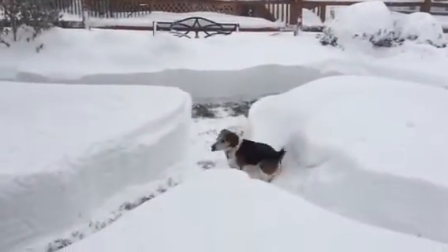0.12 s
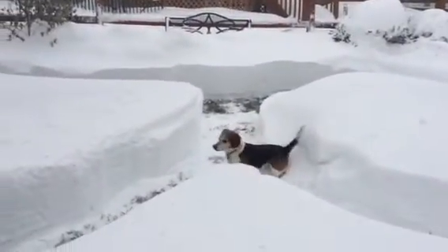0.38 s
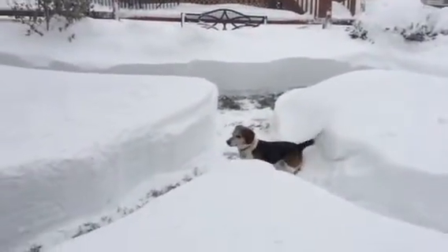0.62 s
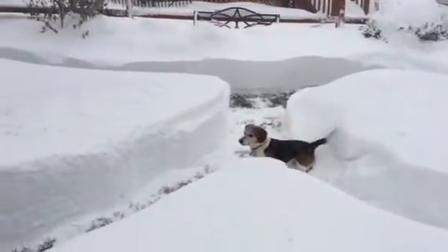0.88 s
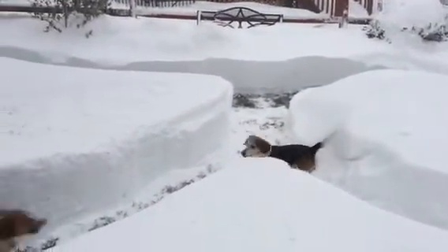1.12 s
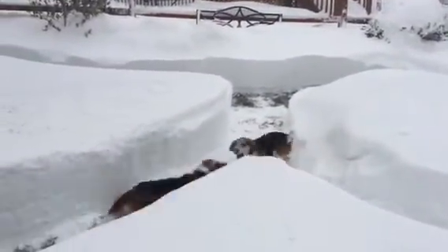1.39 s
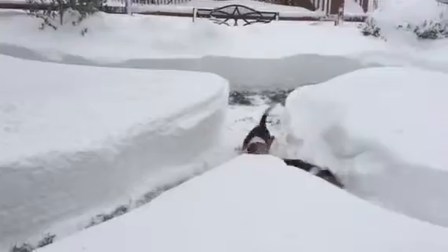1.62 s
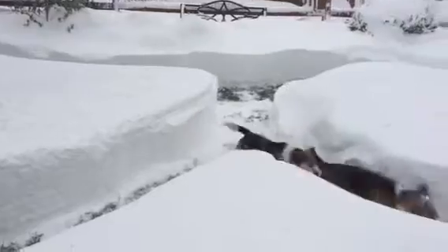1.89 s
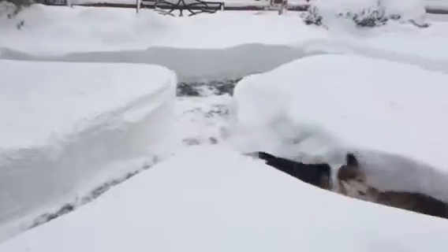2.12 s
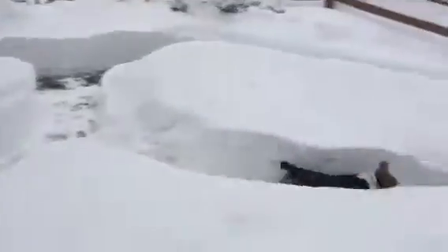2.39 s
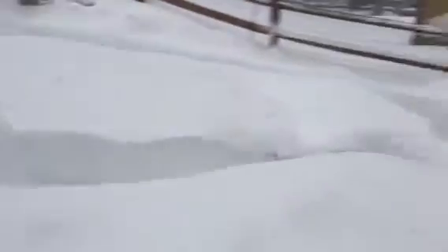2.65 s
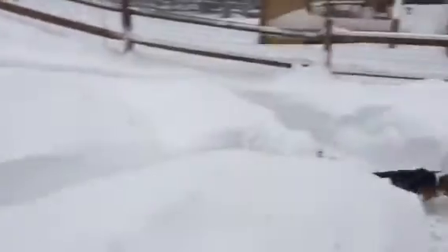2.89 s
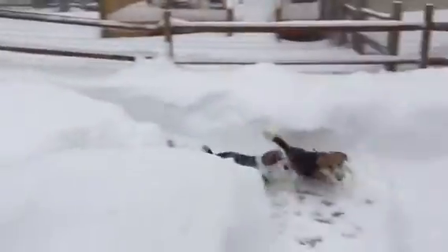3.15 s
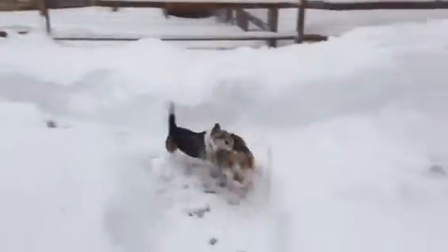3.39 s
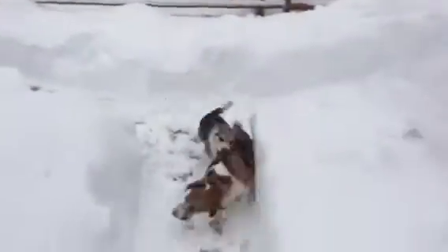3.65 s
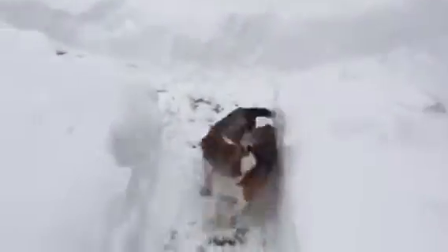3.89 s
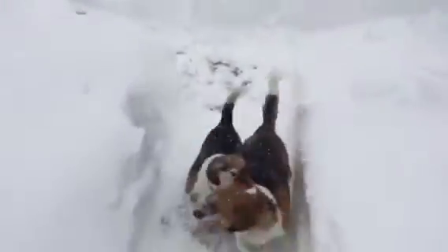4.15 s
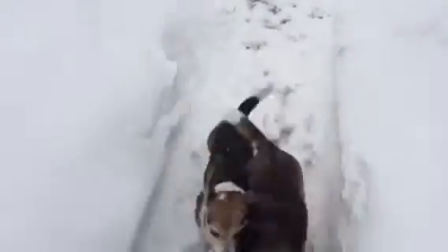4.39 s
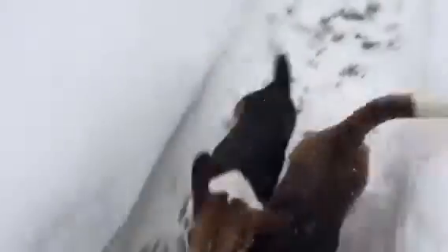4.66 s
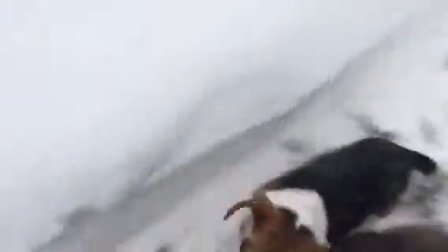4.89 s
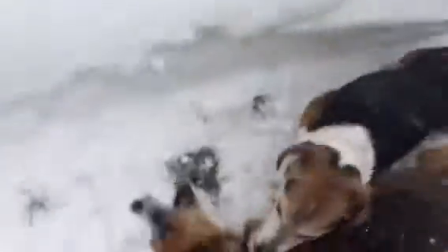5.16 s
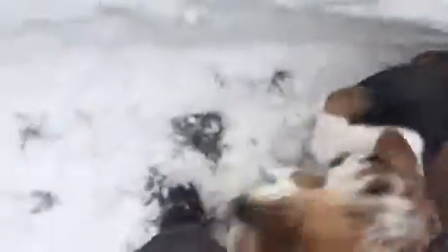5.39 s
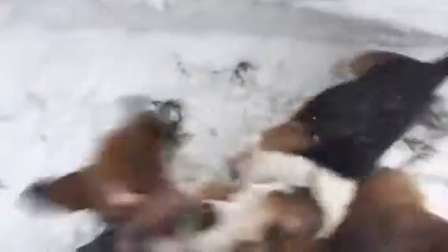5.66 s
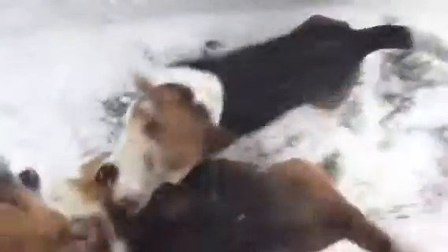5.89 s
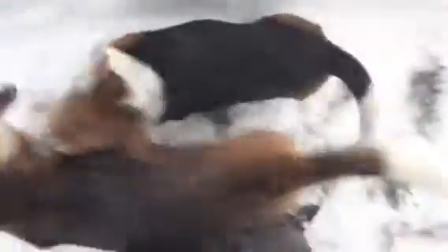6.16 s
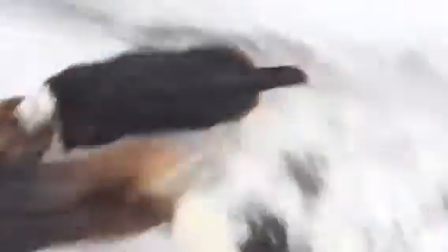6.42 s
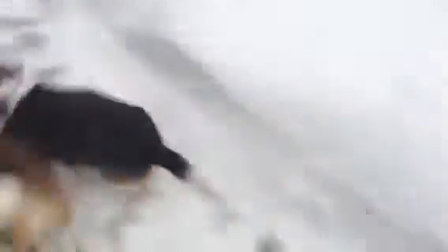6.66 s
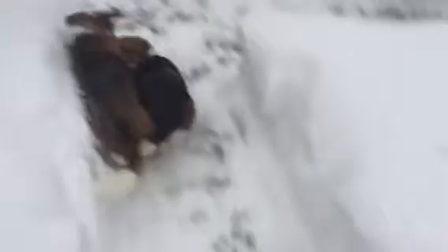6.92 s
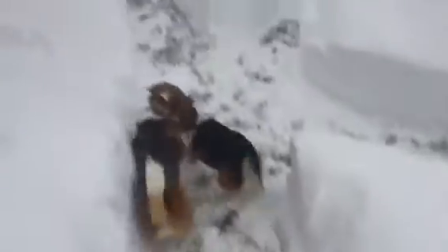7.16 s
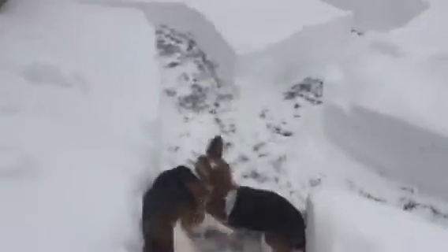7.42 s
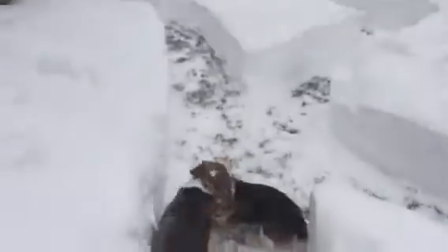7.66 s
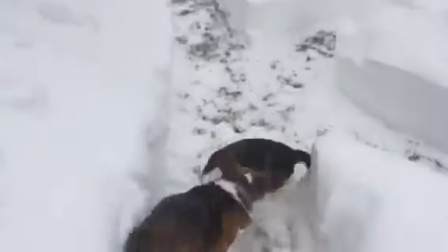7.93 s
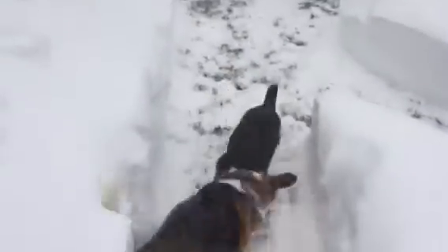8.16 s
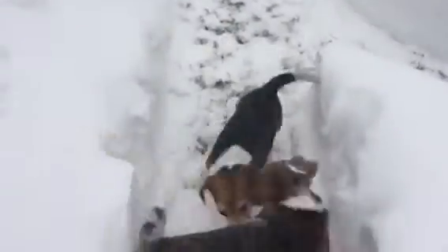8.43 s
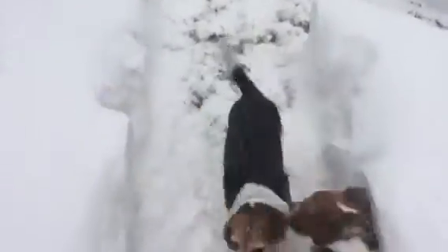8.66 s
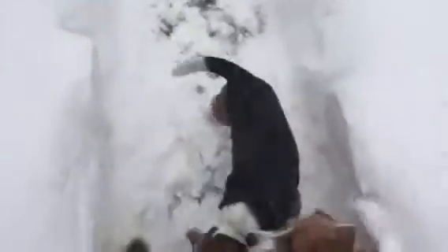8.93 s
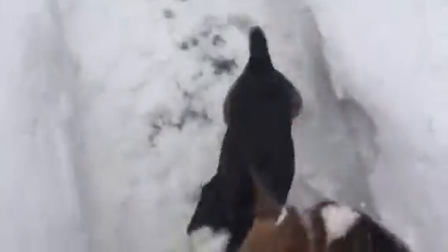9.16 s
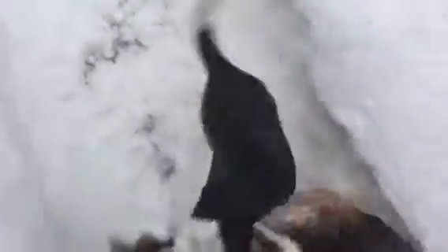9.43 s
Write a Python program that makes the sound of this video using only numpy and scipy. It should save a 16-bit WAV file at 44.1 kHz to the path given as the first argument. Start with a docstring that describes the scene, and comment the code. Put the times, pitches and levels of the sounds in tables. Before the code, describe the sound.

A quiet snow-muffled yard with a very faint steady hiss, heard in mono by a handheld microphone. From 0 to 1.6 s, collar tags clink in small bright touches among faint short puffs of dog breath and a soft low thump. At about 1.7 s comes one brief bark, creaky at its start, then a clear rising and falling yap, with a short dull reflection. From 2 to 3.4 s it is sparse: breaths, tags, a gentle rumble. From 3.5 s the dogs come close: low chesty growls, snaps and dense, bright jingling around 4 to 5 s. A longer, steadier growl sits at 5.3 to 5.8 s, then loud hoarse snarls near 6 s, with crunching snow and heavy low thumps through 7.4 s. A thin high tag ring wavers from 6.4 s. Shorter grunts, rasping breaths and jingles continue to 9.5 s, ending mid-growl.

```python
"""Two dogs wrestle in a path dug through deep snow, over the faint steady hiss of the yard.
First come short puffs of breath, jingling collar tags (struck damped modes) and low thumps (damped sines).
One bark follows (creaky pulses locking into harmonics), with a short answer from the snow walls and fence.
Then chesty growls and hoarse snarls (a fold-rate tone and chopped, filtered air) run on to the end,
amid sharp snaps, crunching noise and ringing tags; late on, one tag rings thin, long and wavering."""
import sys
import numpy as np
from scipy import signal
from scipy.fft import rfft, irfft, next_fast_len
from scipy.io import wavfile
from scipy.ndimage import uniform_filter1d, map_coordinates

SR = 44100
rng = np.random.default_rng(int(sys.argv[2]) if len(sys.argv) > 2 else 0)


def ratio(d):
    """dB to gain"""
    e = np.asarray(d, float) / 20
    return 10 ** e


def to_wav(sig):
    """Store sig (one row per channel, or 1-D mono) as 16-bit WAV at the path in sys.argv[1].

    Samples outside -1..1 are clipped; the rate is SR.
    """
    pcm = np.clip(np.atleast_2d(sig), -1, 1) * 32767
    pcm = np.round(pcm).astype(np.int16)
    wavfile.write(sys.argv[1], SR, pcm.T)  # frames by channels


N = 421155
T = np.arange(N) / SR


def unit(x):
    """Power normalisation: x scaled to rms 1."""
    return x / np.sqrt(np.mean(x ** 2) + 1e-20)


def along(points, hz):
    """Logarithmic frequency scale: (f/Hz, value) points read on a log axis."""
    f, v = np.transpose(points)
    return np.interp(np.log(hz + 1), np.log(f + 1), v)


def curves(rows):
    """Linear interpolation: one value per sample for each column after the time."""
    s, *cols = np.transpose(rows)
    return [np.interp(T, s, c) for c in cols]


def wobble(rate):
    """Band-limited random modulation: a smooth curve with rate knots a second."""
    return map_coordinates(rng.standard_normal(int(N * rate / SR) + 4), [T * rate])


def coloured(x, spectrum):
    """Linear filtering: x through a (f/Hz, level/dB) spectrum, at rms 1."""
    m = next_fast_len(N + 8192)  # padding keeps the end from wrapping onto the start
    gain = ratio(along(spectrum, np.fft.rfftfreq(m, 1 / SR)))
    return unit(irfft(rfft(x, m) * gain, m)[:N])


def patchy(x, depth_db):
    """Time-frequency modulation: x with random patches of gain across both axes."""
    z = signal.stft(x, nperseg=256)[2]
    field = uniform_filter1d(rng.standard_normal(z.shape), size=7, axis=0)
    field = uniform_filter1d(field, size=9, axis=1)
    return unit(signal.istft(z * ratio(depth_db * unit(field)), nperseg=256)[1][:N])


def fade(rows, edge):
    """Gating envelope: 1 while a call lasts, with ramps of edge seconds."""
    return np.clip(np.minimum(T - rows[0][0], rows[-1][0] - T) / edge, 0, 1)


def pulses(phase, scatter_db):
    """Glottal excitation: one click each time the folds close, sizes scattered."""
    at = np.flatnonzero(np.diff(np.floor(phase)) > 0)
    train = np.zeros(N)
    train[at] = ratio(scatter_db * rng.standard_normal(N)[at])
    return train


def add(track, s, sound):
    """Superposition: mix a sound in at time s."""
    part = track[round(s * SR):][:len(sound)]
    part += sound[:len(part)]


# one list per growl: t/s, mean vocal fold rate f/Hz, mean chest tone level/dB
GROWLS = [
    [(1.84, 176, -50), (1.874, 170.9, -46), (1.942, 127, -42), (1.97, 126.7, -61)],
    [(3.52, 170.3, -48), (3.612, 154.6, -47.5), (3.674, 166.6, -34.5), (3.72, 139.9, -40.5),
     (3.784, 147.2, -40.5), (3.846, 193.2, -36), (3.92, 159.8, -56)],
    [(3.95, 127.2, -41), (4.022, 125.6, -52), (4.082, 168.6, -39), (4.154, 156, -43), (4.23, 164.6, -34.5),
     (4.366, 118.2, -49), (4.4, 123.4, -64)],
    [(4.51, 156, -54), (4.542, 160.4, -25), (4.588, 138, -44), (4.62, 140, -58)],
    [(4.81, 173.1, -60), (4.872, 148.4, -42), (4.922, 175.8, -30), (4.992, 150.9, -36.5), (5.08, 158, -43)],
    [(5.33, 106.9, -37), (5.378, 137, -30.5), (5.476, 200, -37.5), (5.52, 203.2, -37), (5.602, 161, -37),
     (5.72, 143.9, -32.5), (5.78, 124, -50)],
    [(5.79, 144.7, -60), (5.804, 144.7, -23), (5.858, 161.3, -48), (5.9, 162, -46)],
    [(5.95, 200.5, -63), (5.974, 201.9, -30), (6.01, 199, -42)],
    [(6.27, 165, -60), (6.3, 170, -32.5), (6.376, 155, -39.5), (6.464, 187.6, -37), (6.5, 185.8, -47)],
    [(6.67, 146, -56), (6.696, 153.4, -24), (6.74, 161, -70)],
    [(7.52, 197, -55), (7.542, 194.8, -31.5), (7.642, 184.5, -49), (7.68, 173, -71)],
    [(7.92, 123, -38), (7.956, 136.6, -43.5), (8.028, 139.2, -34), (8.1, 115.4, -55)],
    [(8.31, 177.5, -62), (8.344, 175.5, -24.5), (8.37, 168, -31.5), (8.41, 164.7, -61)],
    [(8.98, 123, -74), (9.016, 128.4, -30), (9.06, 128, -58)],
    [(9.33, 148, -67), (9.342, 147.8, -47), (9.388, 170.9, -29), (9.476, 189.2, -30.5), (9.55, 165.2, -29)],
]
# the long growl settles into an even voice: t/s, steadiness (0-1)
STEADY = [(5.39, 0), (5.45, 1), (5.74, 1), (5.78, 0)]
# throat resonances: f/Hz, level/dB
THROAT = [(200, 2.5), (350, 1), (450, -2), (630, 7), (800, -4.5), (1300, -12), (2000, -11), (2600, -15),
          (3200, -22), (4500, -50)]
# hiss of the breath: f/Hz, relative level/dB
HISS = [(2000, -62), (2600, 5), (4000, 4), (6000, -6), (12000, -11), (16000, -11)]
# breath colour as heads turn and jaws work: t/s, hiss level/dB over rasp, level/dB under 800 Hz over rasp
TONE = [(0.68, -4, -20), (1.24, -5, -11), (1.5, -6, -3), (2.24, -7, -13), (2.4, -8, 0), (3.6, -12, -8),
        (3.86, -7.5, -2), (4.0, -9, -9), (4.16, -1.5, 1.5), (4.4, 1.5, -14), (4.59, -7, -7),
        (4.88, -9.5, -12), (4.96, -14, 5), (5.04, -8, -11), (5.38, -4, -2.5), (5.5, -11, 8), (5.72, -9, -1),
        (5.81, -6, 3), (5.98, -11, -5), (6.044, -2, 3.5), (6.1, -16, -6), (6.3, -18, -3), (6.62, -9.5, -18),
        (7.0, -4, -8), (7.29, -16, -17), (7.54, -12, 0), (7.64, -17, -10), (8.0, -14, -17), (8.36, -7, -5),
        (8.5, 0, -22), (8.81, -15, -28), (9.03, -13, -13), (9.28, -5, -1.5)]


def growls():
    """Source-filter principle: folds sound a chest tone and chop the air that rasps through throat and mouth."""
    pitch, chest_db = curves(np.vstack(GROWLS))
    on = sum(fade(g, edge=.012) for g in GROWLS)
    steady, = curves(STEADY)
    shaky = 1 - .75 * steady
    phase = np.cumsum(pitch * (1 + .03 * shaky * wobble(45))) / SR
    turn = 2 * np.pi * phase
    chest_level = ratio(chest_db + shaky * (2.8 * wobble(28) + 3.85 * wobble(110)))
    chest = np.sqrt(2) * on * chest_level * np.sin(turn + 0.58 * shaky * wobble(60))
    # the chest wall adds a dull flutter just above the tone
    flutter = coloured(rng.standard_normal(N), [(120, -17), (220, 6), (330, -4), (500, -31)])
    chest += on * shaky * ratio(chest_db - 14.5) * flutter

    # tighter folds close more cleanly; harder air flutters in uneven bursts
    clean = on * np.clip((pitch - 160) * (1 + 2.5 * steady) / 220, .02, .6)
    level_db, mouth_hz = breathing()
    bright_db, deep_db = curves(TONE)
    grit = np.clip((level_db + 62) / 60, .2, .5) * shaky
    chopped_air = np.exp(.55 * on * np.cos(turn) + grit * wobble(260)) * rng.standard_normal(N)
    chopped_air /= np.sqrt(uniform_filter1d(chopped_air ** 2, size=2048) + 1e-9)
    clicks = unit(pulses(phase, scatter_db=1))
    source = np.sqrt(clean) * clicks + np.sqrt(1 - clean) * chopped_air

    hz, t, z = signal.stft(source, SR, nperseg=512)
    hz = hz[:, None]
    low = hz < 780
    # the mouth resonance slides as the jaws open; random patches of gain vary the rest
    detune = (hz - np.interp(t, T, mouth_hz)) / 170
    patches = uniform_filter1d(rng.standard_normal(z.shape), size=3, axis=0)
    patches = uniform_filter1d(patches, size=9, axis=1)
    throat_db = along(THROAT, hz) + 5.1 * np.interp(t, T, shaky) * unit(patches)
    shape = ratio(throat_db) * (1 + 5 / (1 + detune ** 2))
    # the two bands are levelled separately, so that TONE sets their balance
    mouth = ~low * shape / np.sqrt(np.mean(~low * shape ** 2, 0))
    deep = low * shape / np.sqrt(np.mean(low * shape ** 2, 0)) * ratio(np.interp(t, T, deep_db))
    rasp = signal.istft(z * (mouth + deep), SR, nperseg=512)[1][:N]
    hiss = ratio(bright_db) * coloured(patchy(chopped_air, depth_db=2.5), HISS)
    silent_for_bark = 1 - fade(BARK, edge=.01)
    return chest + silent_for_bark * ratio(level_db) * (rasp + hiss)


# short puffs of air through the throats:
# peak t/s, level/dB, swell t/s per 20 dB, fade t/s per 20 dB, mouth resonance f/Hz
PUFFS = [(0.154, -60, .1, .02, 2240), (0.678, -51.5, .05, .065, 1470), (0.934, -56.5, .055, .1, 1730),
         (1.24, -49, .032, .045, 1670), (1.374, -60.5, .11, .04, 1630), (1.502, -49, .037, .04, 1100),
         (1.942, -59, .3, .15, 1160), (2.244, -46, .06, .033, 965), (2.718, -62.5, .3, .05, 950),
         (3.166, -64, .15, .17, 1060), (3.86, -38, .07, .055, 890), (3.998, -39.5, .1, .06, 1500),
         (5.806, -29, .015, .18, 1270), (6.195, -24.5, .17, .055, 1244), (6.288, -31, .028, .19, 1064),
         (6.618, -35.5, .1, .06, 1280), (6.73, -46, .057, .32, 1446), (7.0, -45.5, .043, .067, 1300),
         (7.136, -43, .1, .15, 1260), (7.288, -43.5, .05, .02, 1240), (7.788, -61.5, .3, .06, 1510),
         (8.248, -59, .4, .05, 2170), (8.656, -50, .03, .3, 1290), (8.81, -40, .056, .07, 960),
         (9.034, -45.5, .056, .11, 1292), (9.276, -41, .037, .072, 1150), (9.418, -43, .13, .3, 1050)]
# one list per held breath: t/s, level/dB, mouth resonance f/Hz
HELD = [
    [(2.365, -80, 1040), (2.382, -53, 1040), (2.442, -51.5, 990), (2.48, -72.5, 1380)],
    [(3.43, -85, 1500), (3.51, -58, 1000), (3.592, -60, 1290), (3.8, -59, 980)],
    [(4.04, -62, 1400), (4.075, -49, 1200), (4.16, -43, 1130), (4.22, -47, 1300), (4.26, -58, 1100),
     (4.35, -64, 1075)],
    [(4.37, -62, 2130), (4.402, -43, 2300), (4.528, -46, 1403), (4.586, -42.5, 1790), (4.68, -72, 1417)],
    [(4.72, -70, 1550), (4.88, -32.5, 1287), (4.96, -40.5, 1601), (5.042, -34, 2071), (5.086, -54, 2000),
     (5.126, -60, 1220), (5.25, -65, 1820)],
    [(5.25, -62.5, 1430), (5.38, -35, 1502), (5.494, -37, 1025), (5.594, -36.5, 986), (5.648, -47.5, 1120),
     (5.724, -38, 1493), (5.78, -48.5, 1352)],
    [(5.95, -55, 1316), (5.962, -38, 1330), (5.984, -24, 1360), (6.044, -28, 1103), (6.08, -42, 1142)],
    [(7.5, -71, 1155), (7.536, -50, 1152), (7.636, -45, 1420), (7.71, -64.5, 1270)],
    [(7.9, -73, 1056), (7.936, -55, 1042), (8.052, -52.5, 1080), (8.128, -63.5, 1760)],
    [(8.3, -67, 1370), (8.356, -52, 1377), (8.458, -56.5, 1075), (8.534, -54.5, 1177), (8.62, -78, 1760)],
]


def breathing():
    """Power summation: level of all breaths together, and their power-weighted mean mouth resonance."""
    power = np.full(N, 1e-10)
    weighted_hz = power * 1300
    shapes = []
    for s, db, swell, fading, hz in PUFFS:
        distance = np.maximum((s - T) / swell, (T - s) / fading)
        shapes.append((ratio(db - 20 * distance), hz))
    for rows in HELD:
        level_db, hz = curves(rows)
        shapes.append((fade(rows, edge=.01) * ratio(level_db), hz))
    for gain, hz in shapes:
        power = power + gain ** 2
        weighted_hz = weighted_hz + gain ** 2 * hz
    return 10 * np.log10(power), weighted_hz / power


# the bark: t/s, pitch f/Hz, level/dB, breathy share of power (0-1)
BARK = [(1.695, 95.9, -56, 0.5), (1.715, 99.3, -40, 1), (1.735, 165.7, -39.5, 0.9), (1.745, 255, -27, 0.5),
        (1.762, 316, -25.5, 0), (1.783, 314, -22, .02), (1.795, 347, -22, 0), (1.81, 354, -21.5, .01),
        (1.83, 321.6, -30.5, 0), (1.848, 283, -38.5, 0), (1.87, 270, -76, .3)]
# vocal tract of the bark: f/Hz, relative level/dB
BARK_THROAT = [(150, -48), (250, -17), (346, -31.5), (492, -14), (681, -9), (1060, -1), (1340, -14),
               (1600, -5.5), (1950, -25), (2570, -23.5), (5000, -75), (6500, -100), (11000, -120)]


def bark():
    """Harmonic synthesis: slow, breathy creaks lock into a clear arch of overtones shaped by the throat."""
    pitch, level_db, breathy = curves(BARK)
    phase = np.cumsum(pitch * (1 + 0.0046 * wobble(90))) / SR
    clear = sum(ratio(along(BARK_THROAT, k * pitch)) * np.sin(2 * np.pi * k * phase) for k in range(1, 15))
    clear /= np.sqrt(uniform_filter1d(clear ** 2, size=1024) + 1e-9)
    chopped_air = np.exp(0.5 * np.cos(2 * np.pi * phase)) * rng.standard_normal(N)
    hoarse = coloured(chopped_air, [(20, -82)] + list(BARK_THROAT))
    breathy = np.clip(breathy, 0, 1)
    voice = np.sqrt(1 - breathy) * clear + np.sqrt(breathy) * hoarse
    return fade(BARK, edge=.008) * ratio(level_db) * voice


def banks(x):
    """Diffuse reflection: a short answer from the snow walls and fence, as decaying noise convolved with x."""
    t = np.arange(SR // 4) / SR
    tail = rng.standard_normal(len(t)) * ratio(-60 * t / 0.31) * (t > .004)
    return signal.fftconvolve(x, tail / np.linalg.norm(tail))[:N]


# modes of the metal tags: f/Hz, mean level/dB, decay t60/s before the fur shortens it
TAGS = [(3740, -17, 0.06), (4700, -17, 0.044), (6050, -2.5, 0.049), (6650, -5, 0.053), (7430, -10, 0.044),
        (8580, -6, 0.024), (10430, -15.5, 0.054), (11850, -4, 0.054), (12160, -8.5, 0.022),
        (13060, -10, 0.043), (14380, -12, 0.039), (14700, -16, 0.033), (15100, -12, 0.034)]
# gain of the modes under 8 kHz: level/dB when one of them is struck, level/dB when a high one is
LOW_RING_DB = -2, -13
# a tag left hanging free sings on: t/s, f/Hz, level/dB, t60/s
FREE_TAG = [(1.51, 7100, -60, 0.35), (0.46, 2340, -68, 0.5), (1.54, 3327, -67, 0.66), (2.5, 3327, -69, 0.8),
            (2.87, 6900, -65, 0.74), (2.885, 7230, -66, 0.74), (3.87, 7240, -48.5, 0.23)]


def tags():
    """Modal vibration: a graze and three touches per contact ring fur-damped modes, over a scrape."""
    out, swell = np.zeros(N), np.zeros(N)
    t = np.arange(SR // 10) / SR
    hz, mode_db, t60 = np.transpose(TAGS)[..., None]
    low = hz[:, 0] < 8000
    scrape_spectrum = [(3000, -18), (5500, -3.5), (10000, 4), (14500, 6), (16000, -18.5)]
    scrape = coloured(rng.standard_normal(N), scrape_spectrum)
    onset = 1 - np.exp(-t / .0005)
    # (largest lag in s, level in dB) of each touch
    touches = [(0, 4), (.007, .4), (0.03, -9), (-.03, -14)]
    hits = contacts()
    all_luck = rng.standard_normal((len(hits), 5, len(TAGS)))
    all_dice = rng.random((len(hits), 5))
    for (s, db, best_hz), luck, dice in zip(hits, all_luck, all_dice):
        low_db = LOW_RING_DB[int(best_hz > 8000)]
        clink = ratio(-60 * t / (t60 * (0.14 + 0.45 * dice[4])))
        shimmer = ratio(-25 - 60 * t / (4 * t60))  # outlasts the clink
        detuned_hz = hz * (1 + 0.005 * luck[4][:, None])
        modes = onset * (clink + shimmer) * np.sin(2 * np.pi * detuned_hz * t)
        struck = abs(hz[:, 0] / best_hz - 1) < .012  # the mode under the point of contact leads
        for k, (lag, touch_db) in enumerate(touches):
            mix = ratio(np.where(struck, 5, mode_db[:, 0] + 8 * luck[k]) + low_db * low)
            add(out, s + lag * dice[k], ratio(db + touch_db) * mix / np.linalg.norm(mix) @ modes)
        scrape_s = .012 + .024 * dice[1]
        add(swell, s, ratio(db - 10.5 - 60 * (t / scrape_s) ** 1.5) * onset)
    t = np.arange(SR) / SR
    for s, ring_hz, db, long in FREE_TAG:
        ending = np.clip((.45 - t) / .05, 0, 1)
        add(out, s, ratio(db - 60 * t / long) * np.sin(2 * np.pi * ring_hz * t) * ending)
    return out + swell * scrape


# clear tag contacts: t/s, level/dB, leading mode f/Hz
JINGLES = [(0.1405, -45, 6050), (0.3492, -37, 11860), (0.435, -41, 11860), (0.462, -43.5, 6050),
           (0.62, -48, 13060), (0.7042, -29.5, 10430), (0.7428, -28, 11860), (0.841, -37, 6050),
           (0.941, -35.5, 11860), (0.9552, -31, 11860), (1.0998, -28.5, 11860), (1.1323, -43, 6050),
           (1.2253, -39.5, 11860), (1.2826, -29, 14380), (1.354, -46, 6650), (1.3928, -37, 11860),
           (1.4987, -45, 6650), (1.6965, -41.5, 13060), (1.9237, -38.5, 6050), (1.9468, -41, 6050),
           (2.1255, -29.5, 8580), (2.3033, -45, 11860), (2.3143, -35, 6050), (2.6073, -43, 6050),
           (2.9271, -46.5, 11860), (3.1018, -27, 7430), (3.1168, -30.5, 13060), (3.1662, -34, 13060),
           (3.194, -40.5, 10430), (3.2113, -35.5, 11860), (3.3753, -31, 11860), (3.406, -31, 6050),
           (3.482, -30.5, 6050), (3.4925, -24.5, 10430), (3.5437, -34.5, 6050), (3.669, -28.5, 6050),
           (3.8223, -36.5, 6050), (3.9286, -36, 13060), (4.0247, -31, 6050), (4.1107, -20, 11860),
           (4.1294, -21, 11860), (4.1589, -29.5, 11860), (4.1993, -25, 11860), (4.2314, -22, 11860),
           (4.244, -19.5, 11860), (4.2981, -39.5, 11860), (4.382, -32, 13060), (4.401, -27, 11860),
           (4.441, -36, 13060), (4.4718, -24, 13060), (4.5089, -19.5, 11860), (4.5812, -34.5, 10430),
           (4.6941, -29.5, 13060), (4.7425, -30.5, 6050), (4.7623, -28.5, 6050), (4.8009, -36, 11860),
           (4.837, -23.5, 11860), (4.8483, -28, 11860), (4.8999, -32, 11860), (5.001, -32, 10430),
           (5.0768, -29.5, 11860), (5.1088, -37, 6050), (5.1343, -36, 6050), (5.3548, -29.5, 6050),
           (5.4043, -31.5, 8580), (5.4298, -33, 11860), (5.6189, -22, 14700), (5.636, -30, 11860),
           (5.6615, -20.5, 14380), (5.6853, -28, 6050), (5.741, -33, 13060), (5.7567, -21.5, 14380),
           (5.781, -30, 14700), (5.887, -34, 8580), (6.0143, -42, 6050), (6.0509, -35, 6650),
           (6.194, -33, 6650), (6.313, -35, 14380), (6.3375, -33.5, 11860), (6.3535, -26, 11860),
           (6.5346, -34, 6650), (6.695, -25, 6650), (6.724, -28, 14380), (6.81, -21, 11860),
           (6.9764, -37, 14380), (7.257, -43, 13060), (7.3734, -28.5, 11860), (7.4158, -30, 13060),
           (7.4336, -31, 13060), (7.6073, -28, 6050), (7.765, -44, 11860), (7.9244, -29.5, 11860),
           (8.0995, -37, 13060), (8.2075, -37, 11860), (8.312, -39.5, 11860), (8.4678, -33.5, 6050),
           (8.4897, -35, 14700), (8.546, -30.5, 6050), (8.6423, -37.5, 14700), (8.7355, -28, 6050),
           (8.7566, -29.5, 14380), (8.788, -26, 14700), (8.804, -34, 6050), (9.2146, -39, 7430),
           (9.3044, -39, 11860), (9.3134, -41, 6050), (9.3297, -33, 11860)]


def contacts():
    """Repeated impact: the tags swing back, so two faint rebounds on random modes follow each contact."""
    s, db, hz = np.repeat(JINGLES, 2, axis=0).T
    dice = rng.random((len(s), 3))
    mode = 2 + (dice[:, 2] * (len(TAGS) - 2)).astype(int)
    other_hz = np.transpose(TAGS)[0][mode]
    rebound_s = s + .11 * dice[:, 0]
    rebound_db = db - 19 + 8 * (dice[:, 1] - .5)
    return list(JINGLES) + list(zip(rebound_s, rebound_db, other_hz))


# a long-ringing tag mode: t/s, mean level/dB
TAG_RING = [(6.42, -57), (6.71, -66), (6.8, -56), (7.28, -66), (7.5, -58), (7.9, -81), (8.08, -66),
            (8.75, -72), (9.1, -63), (9.3, -66)]


def tag_ring():
    """Amplitude and phase modulation: a thin, wavering ring of a tag."""
    level_db, = curves(TAG_RING)
    turn = 2 * np.pi * 3327 * T + .9 * wobble(40)
    return np.sqrt(2) * fade(TAG_RING, edge=.03) * ratio(level_db + 3 * wobble(20)) * np.sin(turn)


# crust cracking, teeth clacking: t/s, peak level/dB, body level/dB relative to it
SNAPS = [(0.14, -40, -28), (1.711, -44, 4), (2.383, -46, 13), (3.101, -36, -28), (3.483, -23.5, -30.5),
         (3.5287, -47, 10), (4.0022, -26, -20), (4.573, -30.5, -19), (4.6936, -34, -9), (4.744, -27.5, -29),
         (4.8241, -34.5, 10), (5.7872, -26.5, 0), (6.281, -35, 3), (6.5488, -48, -6), (7.765, -50, -8),
         (8.438, -46, -6)]


def snaps():
    """Transient excitation: each snap is a crisp noise crack over a duller, longer body."""
    crack_spectrum = [(800, -33), (1500, -3.5), (3500, 9), (6000, -9.5), (12000, -53)]
    crack = coloured(rng.standard_normal(N), crack_spectrum)
    body = coloured(rng.standard_normal(N), [(150, -28), (300, -3), (1200, -6.5), (2000, -33)])
    sharp, dull = np.zeros(N), np.zeros(N)
    t = np.arange(SR // 10) / SR
    for s, db, body_db in SNAPS:
        add(sharp, s, ratio(db - 9.5 - 60 * t / 0.041))
        add(dull, s, ratio(db + body_db - 4 - 60 * t / 0.058))
    return sharp * crack + dull * body


# low thumps, and one low growl note of the second dog (at 5.36 s): t/s, peak level/dB, f/Hz
THUMPS = [(0.222, -43.5, 46.3), (0.353, -50, 90), (2.112, -46, 99), (3.362, -39.5, 128), (4.318, -42, 82),
          (4.966, -31, 128.3), (5.36, -20.5, 111.8), (5.566, -43, 94.2), (5.799, -26.5, 129),
          (5.977, -36, 61.9), (6.157, -49, 99.6), (6.334, -27.5, 98.2), (6.443, -28, 59.2),
          (6.821, -27.5, 81), (7.011, -38, 88.8), (7.13, -41, 86.1), (7.256, -28, 114),
          (7.348, -25.5, 71.6), (7.669, -34.5, 66.8), (7.829, -36, 72.7), (8.218, -47, 85.4),
          (8.38, -29, 45.9), (8.657, -40.5, 93), (8.825, -30.5, 61.9), (9.014, -32.5, 124),
          (9.338, -33.5, 101.4)]
# movement in the snow: t/s, rumble level/dB, snow spray level/dB
SCUFFLE = [(0.0, -62, -70.5), (0.79, -56.5, -66.5), (1.67, -50.5, -65), (2.15, -53, -61.5), (2.7, -53, -70),
           (3.07, -53, -69), (3.12, -51, -54), (3.25, -50, -59), (3.36, -49.5, -56), (3.72, -56.5, -61),
           (4.05, -54, -62), (4.15, -52, -55), (4.33, -50.5, -66), (4.5, -50, -53), (4.67, -54, -58),
           (4.86, -57, -47), (5.25, -50, -62), (5.36, -45, -48), (5.53, -38.5, -47), (6.28, -40.5, -55.5),
           (6.6, -34, -48), (7.02, -48, -54.5), (7.82, -57, -60.5), (8.11, -52, -59), (8.8, -46.5, -52.5),
           (9.15, -55, -53), (9.55, -53.5, -61)]
# rumble spectrum: f/Hz, relative level/dB per Hz
RUMBLE = [(15, -58), (25, -7), (70, 1), (92, 2), (291, -11.5), (366, -21.5), (450, -28), (580, -57),
          (990, -120)]


def scuffle():
    """Damped oscillation and granular noise: low thumps and one growl note, a lumpy rumble, grainy spray."""
    rumble_db, spray_db = curves(SCUFFLE)
    lumps = ratio(3.35 * wobble(19))
    out = ratio(rumble_db) * unit(lumps * coloured(rng.standard_normal(N), RUMBLE))
    t = np.arange(SR // 8) / SR
    for s, db, hz in THUMPS:
        # the 10 dB offsets what the slow onset takes from the peak
        envelope = ratio(db + 10 - 60 * t / 0.1) * (1 - np.exp(-t / 0.01))
        add(out, s, envelope * np.sin(2 * np.pi * hz * t))
    grains = rng.standard_normal(N) * ratio(4 * wobble(900) + 1.8 * wobble(40) + 1.2 * wobble(9))
    spray_spectrum = [(300, 6.5), (1500, 7.5), (4000, 2.5), (7000, 3), (12000, 0), (16000, -11)]
    return out + ratio(spray_db) * coloured(patchy(grains, depth_db=3), spray_spectrum)


# yard spectrum: f/Hz, relative level/dB per Hz
YARD = [(180, -22), (300, -2), (433, 3), (900, -4), (2170, -17), (4990, -19), (6200, -8.5), (10400, -36),
        (11900, -13), (15000, -3), (16000, -16)]


def yard():
    """Stationary coloured noise: the snow-muffled hiss of the neighbourhood, gently wavering."""
    return ratio(-77 + wobble(3.25)) * coloured(rng.standard_normal(N), YARD)


def scene():
    """Linear superposition: everything reaches one microphone."""
    call = bark()
    dogs = growls() + call + ratio(-21.5) * banks(call)
    return (dogs + tags() + tag_ring() + snaps() + scuffle() + yard())[None]


def roll_off(x):
    """The treble ends steeply here."""
    return signal.sosfilt(signal.butter(12, 16500, fs=SR, output="sos"), x)


def record(dry):
    """Band limitation: the microphone drops the deepest bass and the highest treble."""
    dry = signal.sosfilt(signal.butter(3, 47, "high", fs=SR, output="sos"), dry)
    dry = signal.sosfilt(signal.butter(12, 16200, fs=SR, output="sos"), dry)
    return roll_off(dry)


dry = scene()
out = record(dry)
to_wav(out)
```